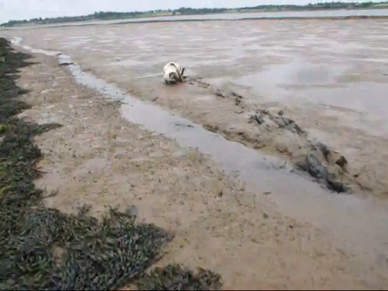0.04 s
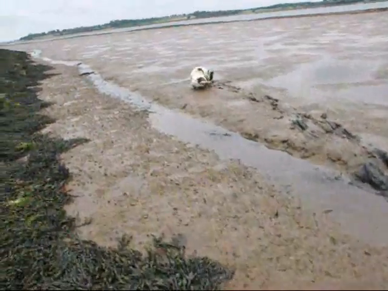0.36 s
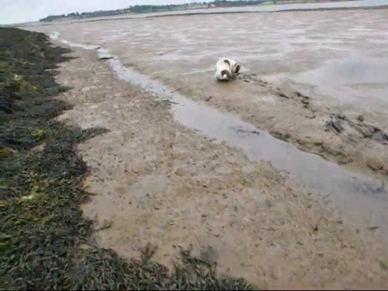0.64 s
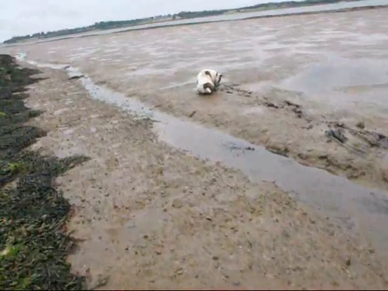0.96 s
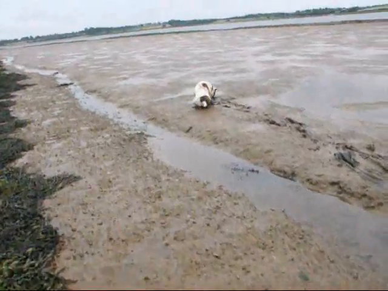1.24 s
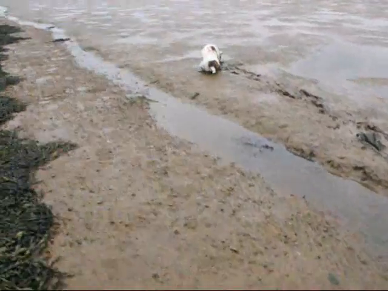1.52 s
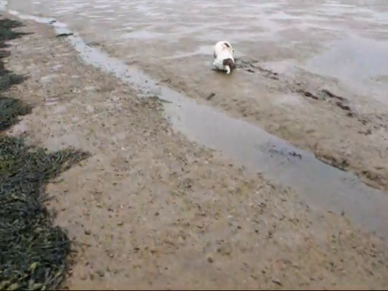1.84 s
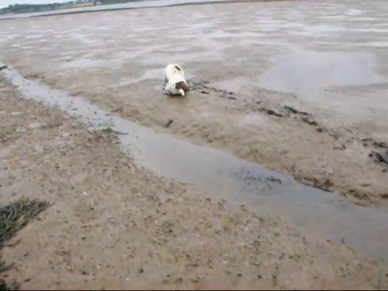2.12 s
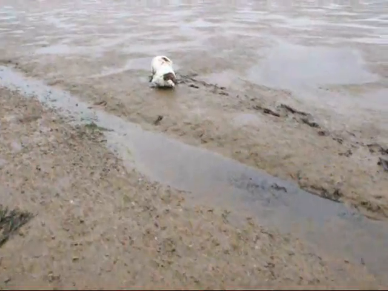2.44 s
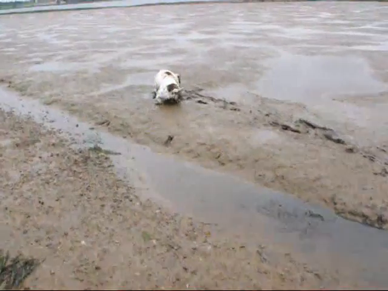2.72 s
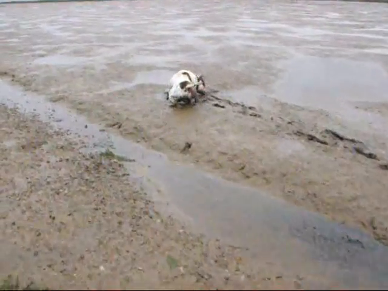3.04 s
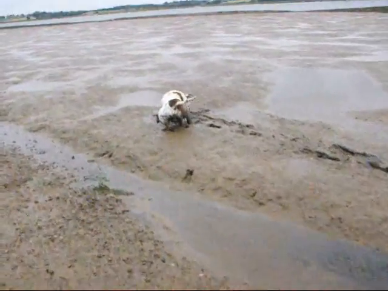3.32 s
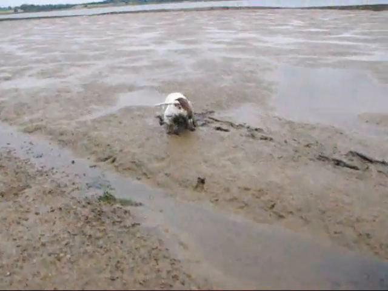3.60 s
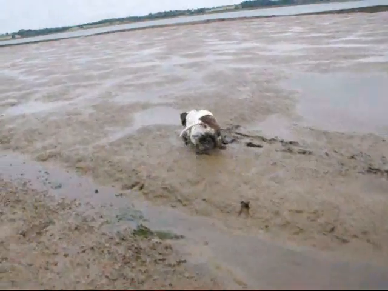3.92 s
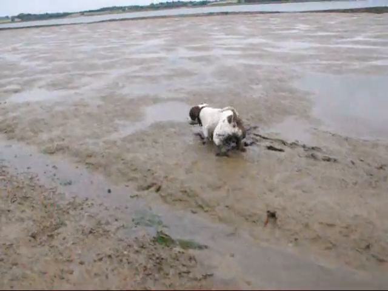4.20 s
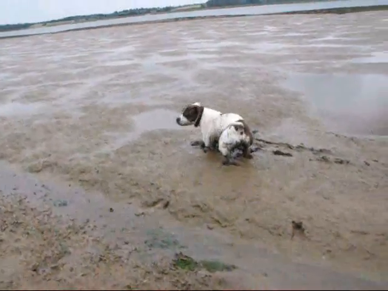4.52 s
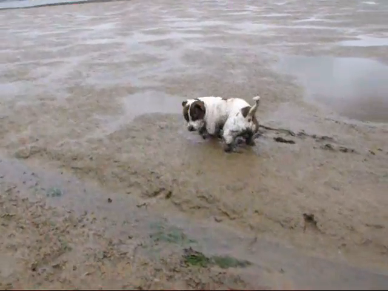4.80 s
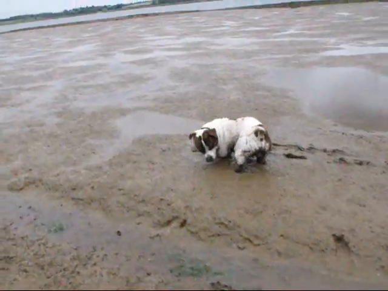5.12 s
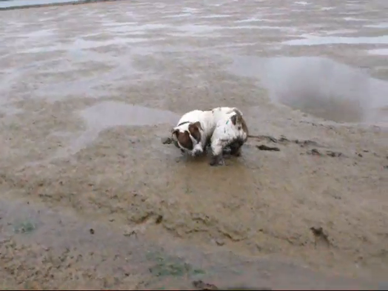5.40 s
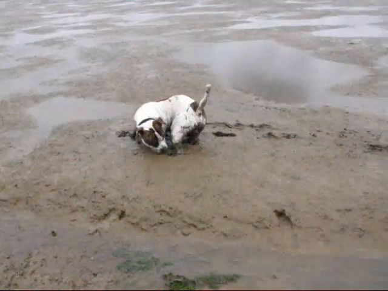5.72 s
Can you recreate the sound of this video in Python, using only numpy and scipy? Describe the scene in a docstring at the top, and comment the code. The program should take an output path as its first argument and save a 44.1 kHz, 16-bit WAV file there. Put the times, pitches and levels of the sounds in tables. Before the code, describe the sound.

Uneven footsteps crunch over wet shingle and squelch in mud while gusts of wind rumble on the microphone.

```python
"""A windy shore of wet shingle and mud, with someone walking over it.
Each tread crunches grit and clacks shells and pebbles together; the mud slurps, pops, bubbles
and squeaks under the boots. Wind rumbles and thumps on the microphone over a faint wash of
distant air and water, and the sharpest cracks overload it."""
import sys
import numpy as np
from scipy import signal
from scipy.fft import rfft, irfft
from scipy.io import wavfile
from scipy.ndimage import uniform_filter1d

SR = 44100
rng = np.random.default_rng(int(sys.argv[2]) if len(sys.argv) > 2 else 0)


def unload_audio(sound):
    """Save the sound as a 16-bit wav file, at the path given as the first command line argument."""
    columns = np.transpose(np.atleast_2d(sound))
    # keep every value between -1 and 1, then stretch to whole-number steps
    steps = np.round(np.clip(columns, -1, 1) * 32767)
    wavfile.write(sys.argv[1], SR, steps.astype(np.int16))


N = 253575
TIME = np.arange(N) / SR
GRID_HZ = np.fft.rfftfreq(512, 1 / SR)
SCRAPE_S = 0.003  # the faint scrape that leads into a clack or pop

# swells of wind over the microphone: start_s, length_s, rumble_db, flutter_db
WIND_SWELLS = [(0.13, 0.24, -20, -22.5), (0.514, 0.27, -17.5, -19), (1.109, .44, -20.5, -25.5),
               (1.714, 0.14, -23.5, -33), (2.103, 0.2, -23, -30), (2.371, .1, -19, -22),
               (2.569, 0.49, -23, -25), (3.203, 0.033, -39, -32), (3.543, 0.053, -23, -26.5),
               (4.009, 0.11, -23, -25), (4.461, 0.49, -21.5, -24), (5.098, 0.31, -17.5, -24),
               (5.495, 0.43, -17.5, -25.5)]
# a heel or sole pressing into the ground: start_s, rise_s, load_s, grit_db, mud_db
FOOTFALLS = [(0.082, .003, 0.078, -21.5, -33), (0.274, 0.018, 0.06, -21.5, -30),
             (0.58, 0.027, 0.25, -29.5, -39.5), (0.80, 0.019, 0.13, -30.5, -34.5),
             (0.89, .025, 0.085, -22.5, -33), (1.117, 0.0038, 0.034, -20.5, -46),
             (1.20, 0.011, 0.03, -25, -46), (1.33, 0.039, 0.18, -35.5, -39.5),
             (1.74, 0.013, 0.024, -22.5, -51), (1.83, 0.0041, .01, -28.5, -48),
             (1.925, .006, 0.13, -29.5, -56), (2.117, 0.0038, 0.031, -20, -29),
             (2.221, 0.0073, 0.028, -24.5, -35), (2.62, 0.046, 0.19, -31.5, -32),
             (2.975, 0.014, 0.026, -24, -35), (3.118, 0.037, 0.048, -23.5, -40),
             (3.277, 0.015, 0.093, -26, -29.5), (3.753, 0.019, 0.11, -27.5, -35),
             (3.882, 0.0046, 0.11, -26, -29), (4.07, 0.023, .11, -29.5, -34.5),
             (4.33, 0.023, 0.26, -30, -39), (4.595, 0.011, 0.039, -24, -28),
             (4.70, 0.0086, 0.039, -27.5, -37), (4.955, .015, 0.22, -26.5, -31.5),
             (5.09, 0.012, 0.069, -23, -24), (5.2, .02, 0.071, -35.5, -33), (5.521, .003, .035, -24, -24.5),
             (5.655, .005, 0.007, -29.5, -24)]
# patches of shell giving way under a heel: start_s, length_s, level_db, hollow_hz, hollow_db
HEEL_CRUSHES = [(0.076, 0.0091, -23, 3600, 5), (2.114, 0.029, -16.5, 2300, 10),
                (5.083, 0.018, -19.5, 3000, -10), (5.104, 0.0097, -11.5, 2740, 20),
                (5.515, 0.0122, -13, 1900, 15), (5.523, 0.01, -18.5, 2620, 11)]
# shells and pebbles knocking together: start_s, level_db, ring_hz
SHELL_KNOCKS = [(0.077, -20.5, 5040), (0.081, -17.5, 5160), (0.1062, -17.5, 5400), (0.2796, -17, 4800),
                (0.6713, -19, 5300), (0.7083, -16.5, 5040), (0.7428, -19.5, 5200), (0.9653, -17.5, 5130),
                (1.1164, -11, 4100), (1.145, -13.5, 4670), (1.3802, -20, 4800), (1.751, -12.5, 4540),
                (1.927, -22.5, 5300), (2.1382, -11, 5050), (2.1412, -11, 4640), (2.2274, -16, 5000),
                (2.2753, -12, 5030), (3.331, -17.5, 5000), (3.6252, -19.5, 5100), (3.8002, -15, 4660),
                (4.45, -19, 4800), (4.5257, -20, 4400), (4.8716, -19.5, 4840), (5.0075, -15, 5000),
                (5.092, -11, 4940), (5.1434, -11.5, 5130), (5.5172, -9.5, 4300), (5.522, -9.5, 4300),
                (5.6635, -16.5, 4650)]
# single eddies thumping the microphone: centre_s, peak_db, pitch_hz
EDDIES = [(0.1996, -15, 172), (0.2781, -6.5, 115), (0.5363, -13, 229), (0.659, -9.5, 141),
          (0.7204, -4, 121), (0.7576, 1, 103), (0.7615, -3, 176), (1.425, -6.5, 240), (1.4326, -5.5, 145),
          (1.5296, -6.5, 140), (1.832, -14, 167), (2.402, -8, 98), (2.8530, -5, 150), (2.9427, -9.5, 134),
          (2.9513, -6, 189), (3.2421, -8, 65.6), (3.2496, -10, 135), (4.064, -7, 166), (4.675, -10.5, 140),
          (4.875, -12.5, 164), (5.3760, -4.5, 181)]
# the hardest gusts: start_s, length_s, level_db
HARD_GUSTS = [(0.753, 0.024, -23.5), (1.518, 0.014, -17), (2.388, 0.11, -20), (2.82, 0.053, -26),
              (4.054, 0.0111, -22.5), (5.361, 0.047, -23)]
# suction as a sole pulls at the mud: start_s, length_s, level_db, start_hz, end_hz
SOLE_SLURPS = [(1.31, 0.012, -34.5, 1100, 1200), (3.271, 0.06, -34.5, 850, 1500),
               (3.713, 0.024, -36.5, 1310, 1100), (4.116, 0.035, -34, 1000, 900),
               (4.34, 0.023, -31, 2110, 2000), (4.589, 0.024, -27.5, 1400, 1250),
               (5.062, 0.016, -30, 1150, 1100), (5.133, 0.024, -32, 1250, 1600)]
# air pockets bursting in the mud: start_s, level_db, hollowness (0 to 1)
MUD_POPS = [(2.1016, -20, 0.9), (2.1869, -11, 0.74), (2.461, -12, 0.68), (2.696, -20, 0.9),
            (2.7334, -21, 0.6), (3.1996, -19, 0.06), (3.367, -12.5, 0.73), (3.4336, -19, 0.84),
            (3.4432, -17, 0.68), (3.662, -18, 0.95), (3.8808, -14, 0.9), (3.9804, -5.5, 0.39),
            (4.019, -20, 0.64), (4.0265, -14, 0.47), (4.0371, -11.5, 0.43), (4.0441, -12, 0.48),
            (4.265, -20, 1), (4.304, -20, 0.57), (5.101, -4.5, 0.22), (5.1044, -16, 0.4), (5.167, -17, 0.8),
            (5.1898, -16.5, 0.83), (5.3464, -22.5, 1.0), (5.511, -17, 1), (5.638, -21.5, 1.0)]
# water squeezed from the mud: start_s, level_db, start_hz, end_hz, length_s, overtone_step_db
MUD_BUBBLES = [(3.620, -23, 4400, 4530, 0.017, -40), (3.621, -22, 6350, 5850, 0.0084, -40),
               (4.073, -21.5, 5500, 5540, .012, -40), (4.121, -25, 880, 920, 0.016, -30),
               (4.301, -30, 2850, 3060, 0.028, -14), (4.321, -28.5, 2740, 2730, 0.042, -8.5)]

# the tone colour of each layer: frequency_hz, gain_db
SHORE_EQ = [(30, -17), (200, -18), (600, -10), (1500, -8.5), (4000, -13), (8000, -24), (15500, -32)]  # distant air and water
RUMBLE_EQ = [(8, -5.5), (25, 0.5), (60, -2), (100, -6.5), (140, -19), (220, -64), (600, -47.5)]  # deep swings of wind pressure
FLUTTER_EQ = [(40, -4.5), (90, -3.5), (140, 4), (250, -5), (400, -12), (600, -22), (1000, -28.5),
              (2500, -49), (6000, -70)]  # wind flapping at the microphone port
GRIT_EQ = [(300, -45), (1000, -34.5), (2000, -9), (3000, -4), (4300, 1), (5500, -0.5), (6600, -1.5),
           (8000, -9.5), (10000, -38.5), (15500, -13.5)]  # bright, dry crunch
MUD_EQ = [(150, -12), (500, 1), (1000, -0.5), (1700, -2), (2900, 1.5), (4200, -8.5), (6000, -20),
          (8000, -6.5), (15500, -18)]  # wet squelch
SHELL_EQ = [(300, -42), (1500, -9), (2800, -6), (3700, -1), (5000, -1), (6800, -1), (8200, -9.5),
            (10000, -26), (15500, -10)]  # hard clack
ROAR_EQ = [(120, -10), (300, 2.5), (420, 4), (600, -7), (900, -13), (1500, -23.5), (4000, -51)]  # low-mid roar of a gust
POP_EQ = [(200, -31), (700, -4), (1100, 1.5), (1600, 3.5), (2100, -3.5), (3300, 4.5), (4200, -22),
          (5600, -41), (6700, -22), (7900, -4.5), (10000, -21), (13800, -16), (15500, -18.5)]  # hollow pocket in the mud
# the microphone's response, with a treble notch from its port: frequency_hz, gain_db
MICROPHONE_EQ = [(20, 0.5), (7500, 0.5), (9000, 1.5), (10400, -5), (11800, -5.5), (13000, 3), (14300, 5.5),
                 (15300, 5.5)]


def amp(db):
    """Decibels to gain."""
    return 10 ** (np.asarray(db) / 20)


def unit_rms(x):
    """Scales to rms 1."""
    return x / np.sqrt(np.mean(x ** 2) + 1e-20)


def eq_db(curve, hz=GRID_HZ):
    """Reads an EQ curve on a log-frequency axis."""
    curve_hz, db = np.transpose(curve)
    return np.interp(np.log(hz + 1), np.log(curve_hz + 1), db)


def add(mix, start_s, sound):
    """Mixes a sound in at start_s."""
    part = mix[max(round(start_s * SR), 0):][:len(sound)]
    part += sound[:len(part)]


def coloured(x, db):
    """Minimum-phase EQ with the gains db on the frequency grid."""
    cepstrum = irfft(np.log(amp(db)))
    half = len(db) - 1
    cepstrum[1:half] *= 2
    cepstrum[half + 1:] = 0
    impulse = irfft(np.exp(rfft(cepstrum)))
    return signal.fftconvolve(x, impulse)[:len(x)]


def noise(curve):
    """Steady noise of rms 1, shaped by an EQ curve."""
    gain = amp(eq_db(curve, np.fft.rfftfreq(N, 1 / SR)))
    return unit_rms(irfft(rfft(rng.standard_normal(N)) * gain, N))


def levelled(x, span_s):
    """Rides the rms to about 1 over span_s, leaving faster detail alone."""
    size = int(span_s * SR) + 1
    power = uniform_filter1d(uniform_filter1d(x ** 2, size), size)
    return x / np.sqrt(abs(power) + 1e-9)


def ring(hz, width_hz):
    """A resonance peak of height 1 on the frequency grid."""
    return 1 / (1 + ((GRID_HZ - hz) / width_hz) ** 2)


def envelope(start_s, length_s, attack_s, release_s, first_db, last_db):
    """Rises towards start_s, slopes from first_db to last_db over length_s, then dies away."""
    t = TIME - start_s
    slope = amp(np.interp(t, [0, length_s], [first_db, last_db]))
    return slope * np.exp(np.minimum(t, 0) / attack_s - np.maximum(t - length_s, 0) / release_s)


def shore_wash():
    """A faint, steady bed of distant air and water."""
    return amp(-40) * noise(SHORE_EQ)


def wind_strength(surge_db=3.5, surge_s=0.035, rumble_share=0.48):
    """Gains for rumble and flutter: swells on top of a light breeze, all surging at random."""
    rumble_power, flutter_power = amp(-34.5) ** 2, amp(-38.5) ** 2  # the breeze in the lulls
    for start_s, length_s, rumble_db, flutter_db in WIND_SWELLS:
        swell = envelope(start_s, length_s, attack_s=0.016, release_s=0.032, first_db=-3, last_db=0)
        rumble_power += (amp(rumble_db) * swell) ** 2
        flutter_power += (amp(flutter_db) * swell) ** 2
    drift = uniform_filter1d(rng.standard_normal(N), int(surge_s * SR) + 1)
    trend = uniform_filter1d(drift, int(2 * surge_s * SR) + 1)
    swing_db = surge_db * levelled(drift - trend, 0.18)
    rumble_gain = np.sqrt(rumble_power) * unit_rms(amp(rumble_share * swing_db))
    flutter_gain = np.sqrt(flutter_power) * unit_rms(amp(swing_db))
    return rumble_gain, flutter_gain


def wind():
    """Turbulence at the microphone port: deep rumble, and lumps of flutter with each pressure swing."""
    rumble_gain, flutter_gain = wind_strength()
    pressure = levelled(noise(RUMBLE_EQ), 0.046)
    flutter = levelled(noise(FLUTTER_EQ) * (0.9 + abs(pressure)), 0.014)
    return rumble_gain * pressure + flutter_gain * flutter


def boot_load(shift_db=-35.5, seep_db=-39.5, onto_mud_s=5.35, onto_mud_db=-5.5, settle_s=0.024):
    """Gains for grit and mud as the boots press; between treads the ground still shifts and seeps."""
    # the stones shift less as the walker steps off the shingle onto mud
    on_mud = np.clip((TIME - onto_mud_s) / settle_s, 0, 1)
    grit_power, mud_power = amp(shift_db + onto_mud_db * on_mud) ** 2, amp(seep_db) ** 2
    for start_s, rise_s, load_s, grit_db, mud_db in FOOTFALLS:
        load = envelope(start_s, load_s, rise_s, settle_s, first_db=0, last_db=-2.5)
        grit_power += (amp(grit_db) * load) ** 2
        mud_power += (amp(mud_db) * load) ** 2
    return np.sqrt(grit_power), np.sqrt(mud_power)


def grains(curve, per_s, spread_db, ring_db, wash, kinds=24):
    """Tiny contacts of uneven size, each kind with its own peak or notch, over a wash of finer ones."""
    out = np.zeros(N)
    for hz in np.geomspace(900, 7500, kinds):
        hit = rng.random(N) < per_s / kinds / SR
        polarity = rng.choice([-1, 1], hit.sum())
        size = np.minimum(rng.exponential(1, hit.sum()), 4)
        clicks = np.zeros(N)
        clicks[hit] = polarity * amp(spread_db * size)
        out += coloured(clicks, eq_db(curve) + ring_db * ring(hz, 260))
    return unit_rms(out) + wash * noise(curve)


def treads(grit_gain, mud_gain):
    """Grit grinds and mud squelches as the weight comes on and off."""
    grit = grains(GRIT_EQ, per_s=1000, spread_db=3.8, ring_db=12, wash=0.68)
    mud = grains(MUD_EQ, per_s=700, spread_db=2, ring_db=13.5, wash=0.55)
    return grit_gain * levelled(grit, 0.05) + mud_gain * levelled(mud, 0.32)


def crushes():
    """Many shell edges break at once, coloured by the hollow of the wet heel print."""
    splinters = grains(GRIT_EQ, per_s=3500, spread_db=10.5, ring_db=-24, wash=0.71, kinds=8)
    splinters = levelled(splinters, 0.0036)
    out = np.zeros(N)
    for start_s, length_s, level_db, hollow_hz, hollow_db in HEEL_CRUSHES:
        crunch = splinters[round(start_s * SR):][:round(length_s * SR)]
        crunch = unit_rms(coloured(crunch, hollow_db * ring(hollow_hz, width_hz=520)))
        add(out, start_s, amp(level_db) * crunch * signal.windows.tukey(len(crunch), 0.2))
    return out


def crack(colour_db, contact_s, scatter, decay_s, scrape_db):
    """A faint scrape, a sharp snap and a short scattering tail; rms 1 over the attack."""
    t = TIME[:1024] - SCRAPE_S
    scrape = amp(scrape_db) * np.exp(np.minimum(t, 0) / SCRAPE_S)
    tail = scatter * np.exp(-abs(t) / decay_s)
    burst = rfft(rng.standard_normal(len(t)) * np.exp(-((t - contact_s) / contact_s) ** 2))
    snap = irfft(burst / (abs(burst) + 1e-9))  # equally strong at every pitch
    debris = np.where(t < 0, scrape, tail) * rng.standard_normal(len(t))
    sound = coloured(snap + debris, colour_db)
    onset = round(SCRAPE_S * SR)
    return sound / np.sqrt(np.mean(sound[onset:2 * onset] ** 2))


def shells(grit_gain, loose_per_s=14, loose_above_grit_db=5, loose_hz=5000):
    """Shells clack with three rings each; loose ones tip at random, as hard as the grit is pressed."""
    out = np.zeros(N)
    tipped = np.flatnonzero(rng.random(N) < loose_per_s / SR)
    loose = [(i / SR, 20 * np.log10(grit_gain[i]) + loose_above_grit_db, loose_hz) for i in tipped]
    knocks = list(SHELL_KNOCKS) + loose
    for (start_s, level_db, ring_hz), (low, high) in zip(knocks, rng.random((len(knocks), 2))):
        side_rings = ring(3500 + 1200 * low, 200) + ring(5500 + 1800 * high, 220)
        colour_db = eq_db(SHELL_EQ) + 7 * ring(ring_hz, 580) + 10 * side_rings
        clack = crack(colour_db, contact_s=0.00041, scatter=0.088, decay_s=0.0044, scrape_db=-22)
        add(out, start_s - SCRAPE_S, amp(level_db) * clack)
    return out


def buffets():
    """An eddy thumps the microphone: one push of pressure with suction before and after."""
    out, t = np.zeros(N), np.arange(-900, 900) / SR
    for centre_s, peak_db, pitch_hz in EDDIES:
        spread = (np.pi * pitch_hz * t) ** 2
        add(out, centre_s + t[0], amp(peak_db) * (1 - 2 * spread) * np.exp(-spread))
    return out


def gusts():
    """The hardest gusts break into smaller eddies and roar higher."""
    out, roar = np.zeros(N), levelled(noise(ROAR_EQ), 0.01)
    for start_s, length_s, level_db in HARD_GUSTS:
        blast = roar[round(start_s * SR):][:round(length_s * SR)]
        add(out, start_s, amp(level_db) * blast * signal.windows.tukey(len(blast), 0.5))
    return out


def slurps(width_hz=650, tears_per_s=700):
    """Tearing films of water excite a cavity whose pitch slides as it changes size."""
    out, pole = np.zeros(N), np.exp(-np.pi * width_hz / SR)
    for start_s, length_s, level_db, start_hz, end_hz in SOLE_SLURPS:
        n = round(length_s * SR)
        tearing = rng.standard_normal(n) * (0.066 + (rng.random(n) < tears_per_s / SR))
        glide = np.exp(2j * np.pi * np.cumsum(np.linspace(start_hz, end_hz, n)) / SR)
        # shift down, low-pass, shift back: a resonance that rides the glide
        cavity = (glide * signal.lfilter([1], [1, -2 * pole, pole ** 2], tearing / glide)).real
        add(out, start_s, amp(level_db) * unit_rms(cavity * signal.windows.tukey(n, 0.5)))
    return out


def pops():
    """Hollow air pockets burst with the mud's resonances; shallow ones sound more like grit."""
    out = np.zeros(N)
    sizes = np.exp(0.066 * rng.standard_normal(len(MUD_POPS)))  # bigger pockets ring lower
    for (start_s, level_db, hollowness), size in zip(MUD_POPS, sizes):
        colour_db = hollowness * eq_db(POP_EQ, GRID_HZ * size) + (1 - hollowness) * eq_db(GRIT_EQ)
        pop = crack(colour_db, contact_s=0.000093, scatter=0.15, decay_s=0.0032, scrape_db=-35)
        add(out, start_s - SCRAPE_S, amp(level_db) * pop)
    return out


def bubbles():
    """Water squeezed from the mud bubbles and squeaks: short wavering tones with odd overtones."""
    out = np.zeros(N)
    for start_s, level_db, start_hz, end_hz, length_s, overtone_step_db in MUD_BUBBLES:
        progress = np.linspace(0, 1, round(length_s * SR))
        waver = 0.04 * unit_rms(uniform_filter1d(rng.standard_normal(len(progress)), size=30))
        pitch_hz = (start_hz + (end_hz - start_hz) * progress) * (1 + waver)
        phase = 2 * np.pi * np.cumsum(pitch_hz) / SR
        tone = sum(amp(overtone_step_db * k) * np.sin((2 * k + 1) * phase) for k in range(3))
        attack = 1 - np.exp(-progress / 0.024)
        fade = np.exp(-1.2 * progress) * (1 - progress)
        add(out, start_s, amp(level_db) * unit_rms(attack * fade * tone))
    return out


def scene():
    """Wind and boots in mono, out on open flats with no echo."""
    air = wind() + buffets() + gusts() + shore_wash()
    grit_gain, mud_gain = boot_load()
    boots = treads(grit_gain, mud_gain) + crushes() + pops() + slurps() + bubbles() + shells(grit_gain)
    return (air + boots)[None]


def record(dry):
    """The microphone colours the mix, overloads on the sharpest peaks and cuts the top treble."""
    overloaded = np.clip(coloured(dry[0], eq_db(MICROPHONE_EQ)), -1, 1)
    high_cut = signal.firwin(511, cutoff=15620, window=("kaiser", 8), fs=SR)
    return signal.oaconvolve(overloaded, high_cut, "same")[None]


dry = scene()
out = record(dry)
unload_audio(out)
```